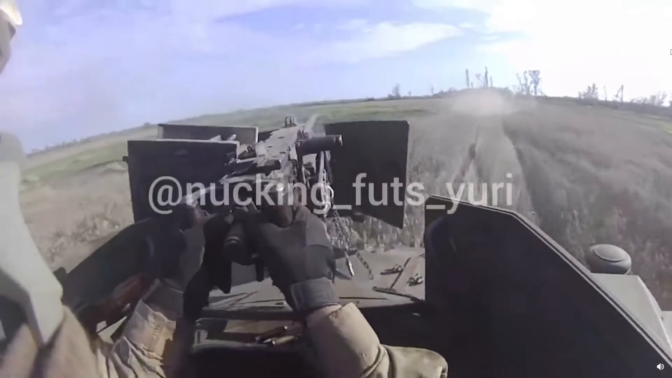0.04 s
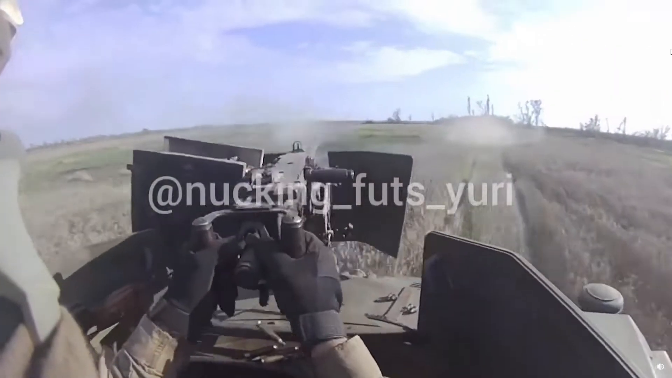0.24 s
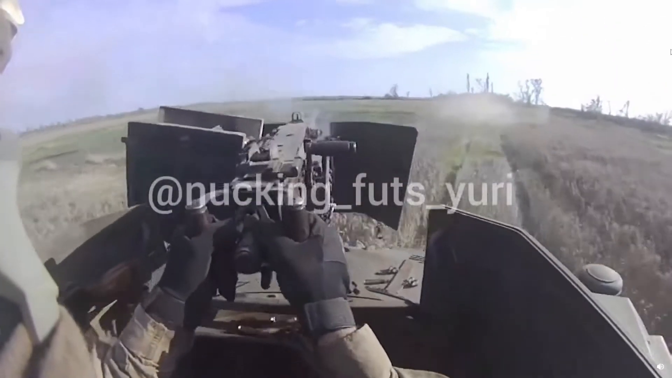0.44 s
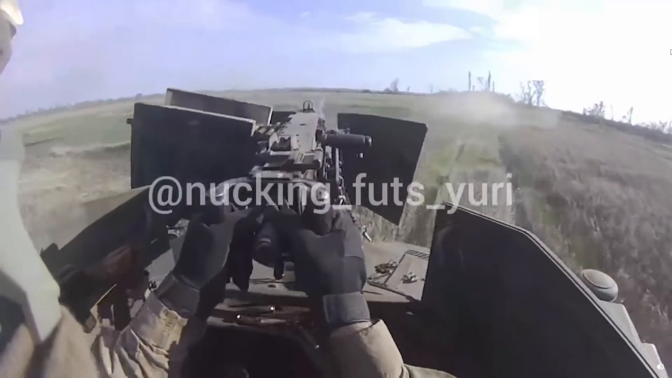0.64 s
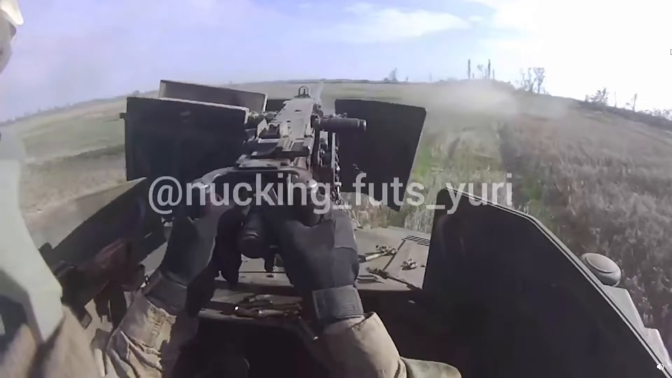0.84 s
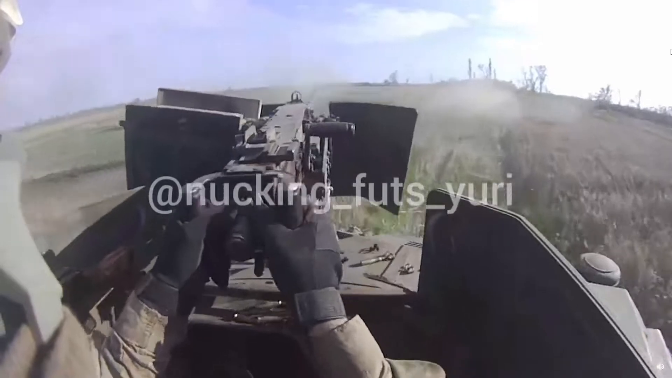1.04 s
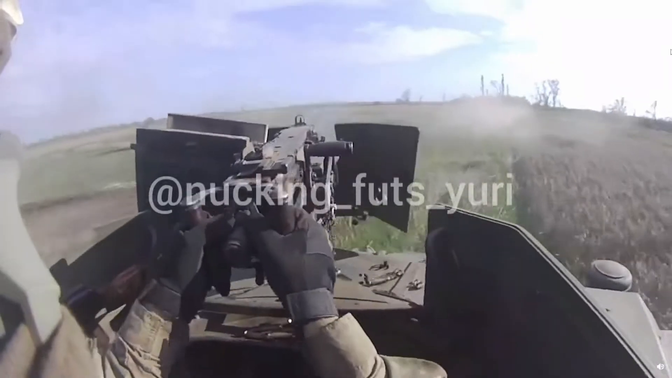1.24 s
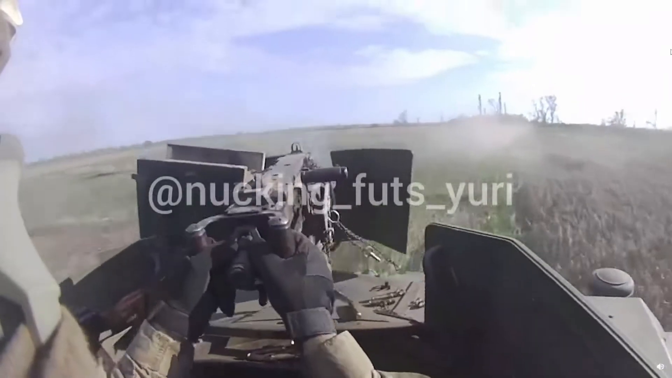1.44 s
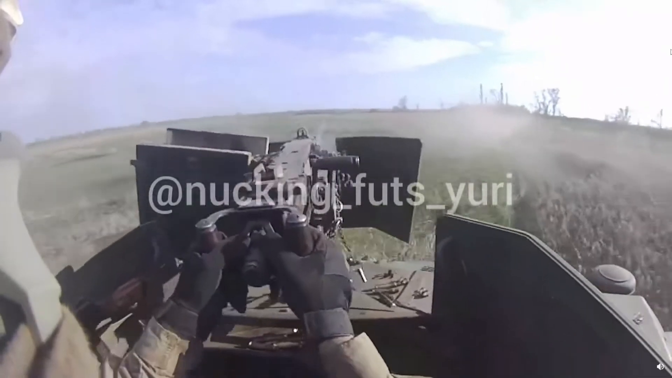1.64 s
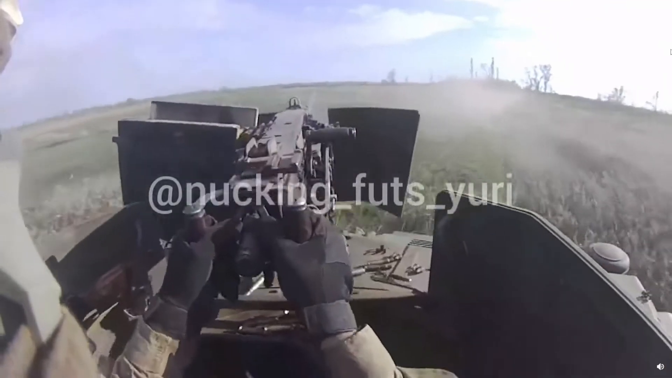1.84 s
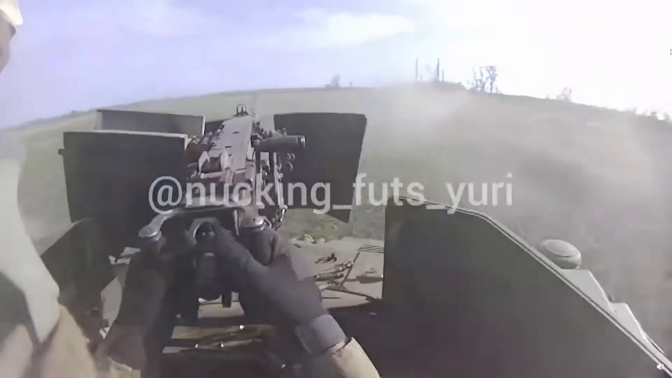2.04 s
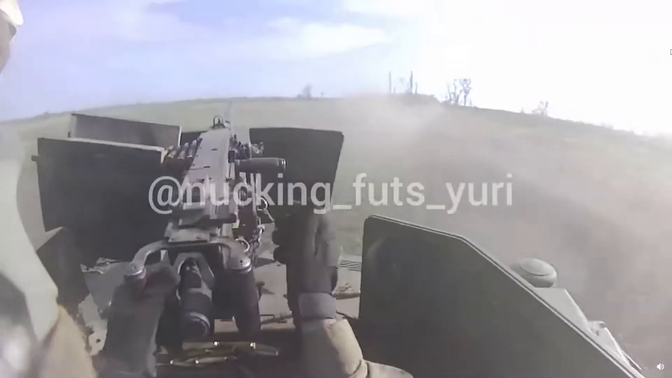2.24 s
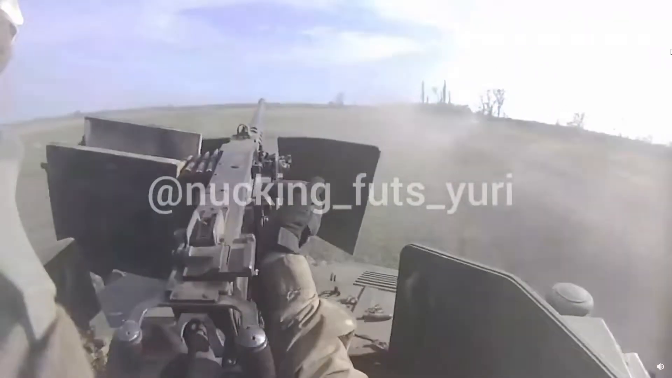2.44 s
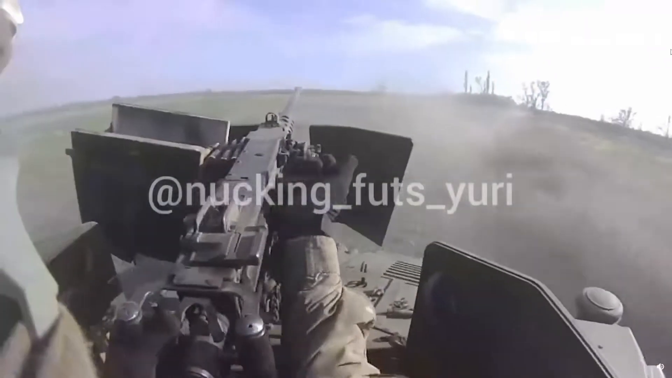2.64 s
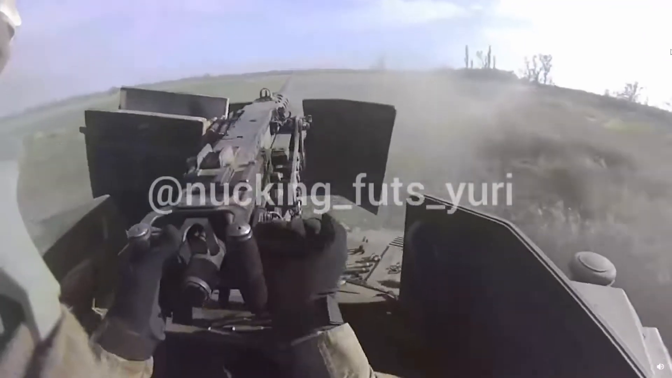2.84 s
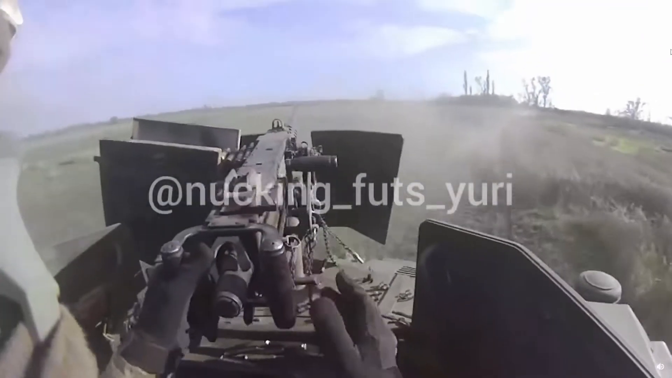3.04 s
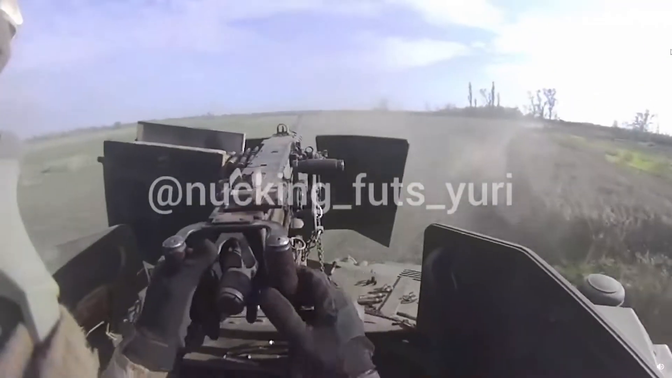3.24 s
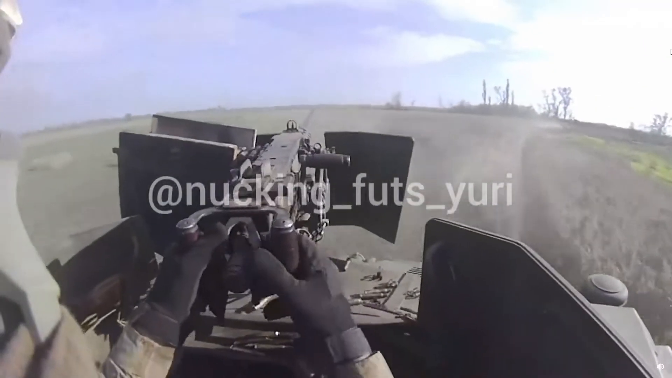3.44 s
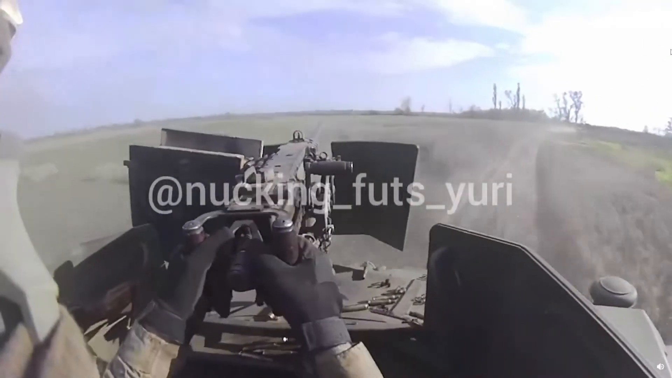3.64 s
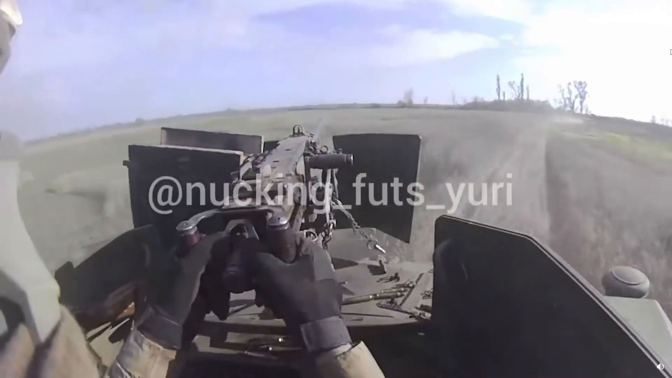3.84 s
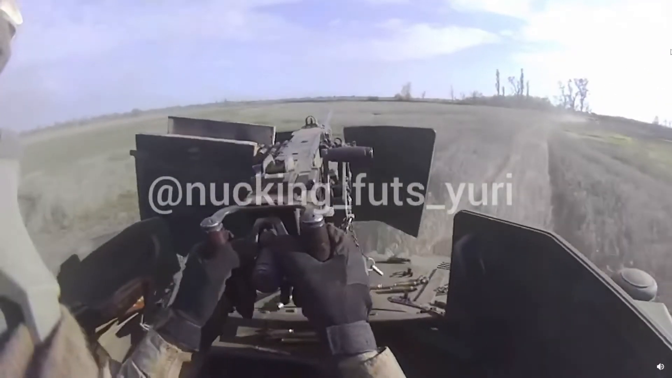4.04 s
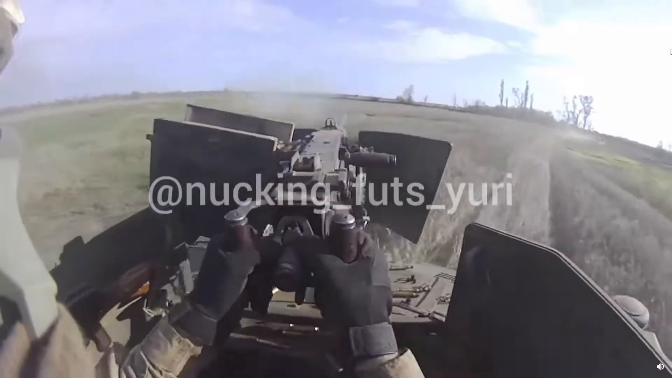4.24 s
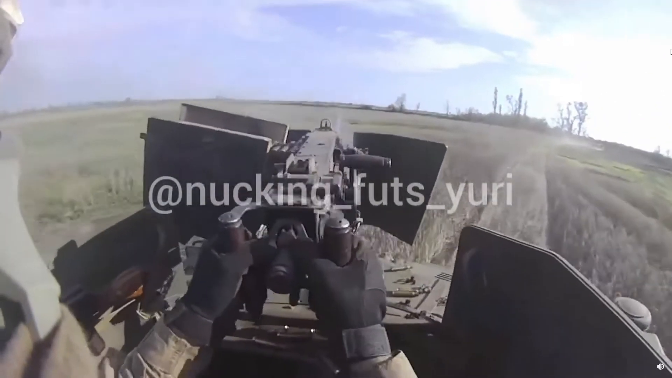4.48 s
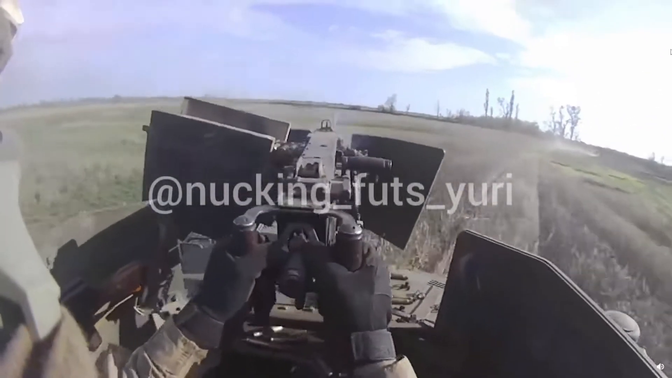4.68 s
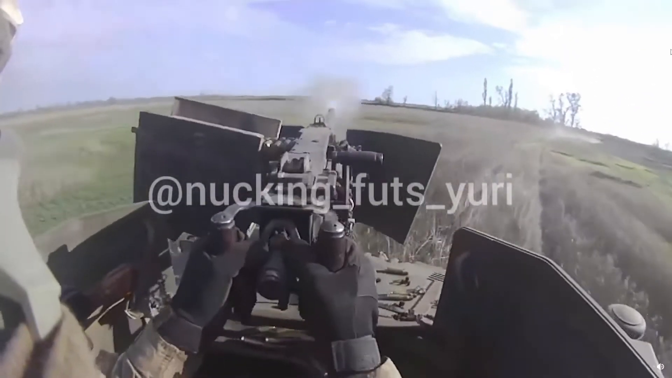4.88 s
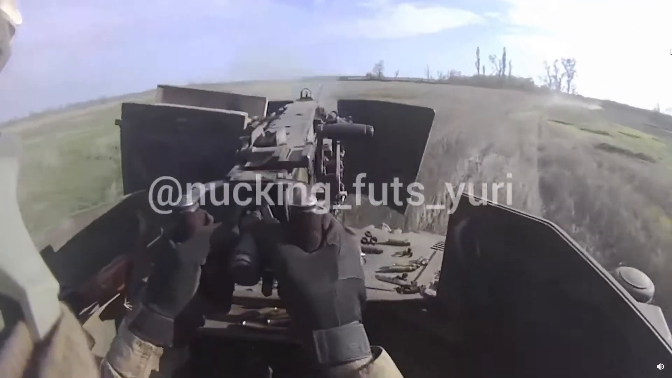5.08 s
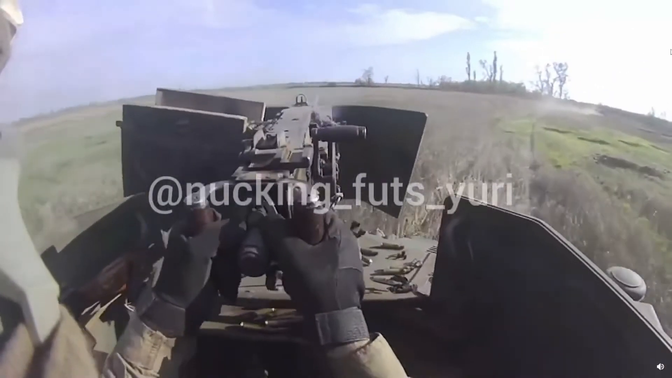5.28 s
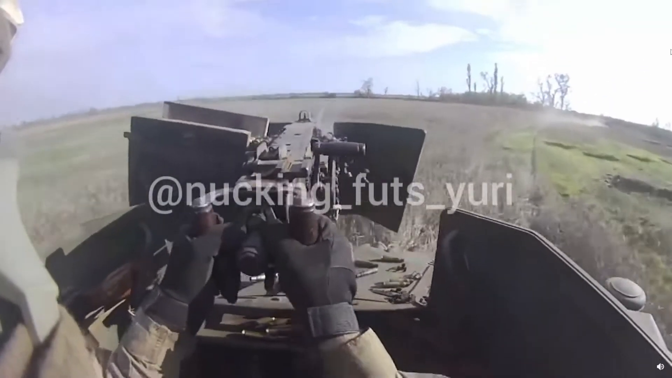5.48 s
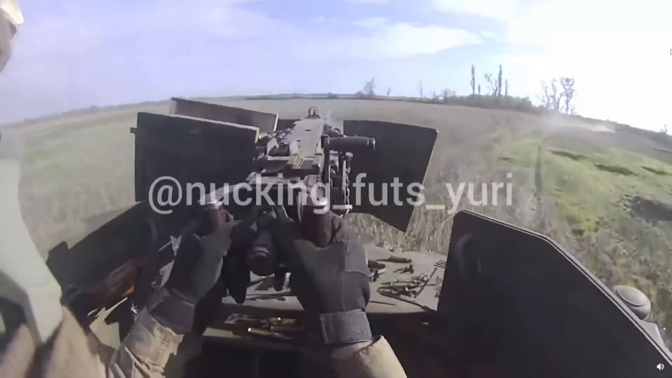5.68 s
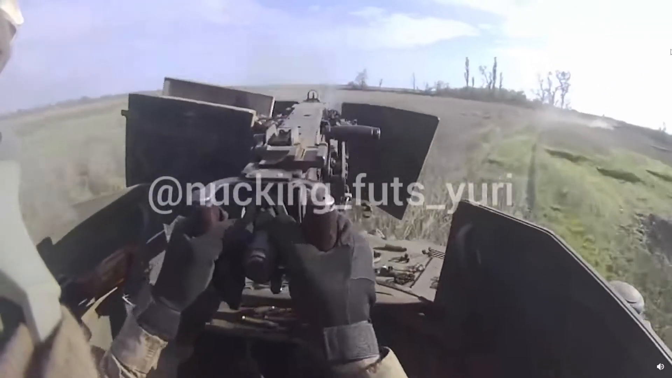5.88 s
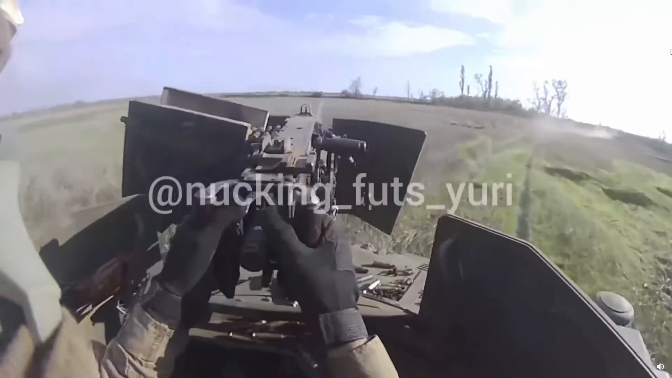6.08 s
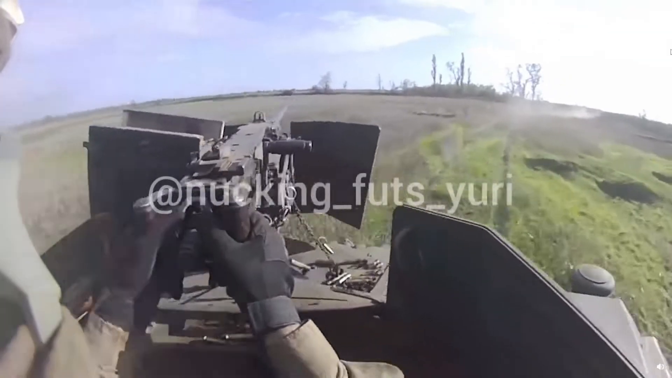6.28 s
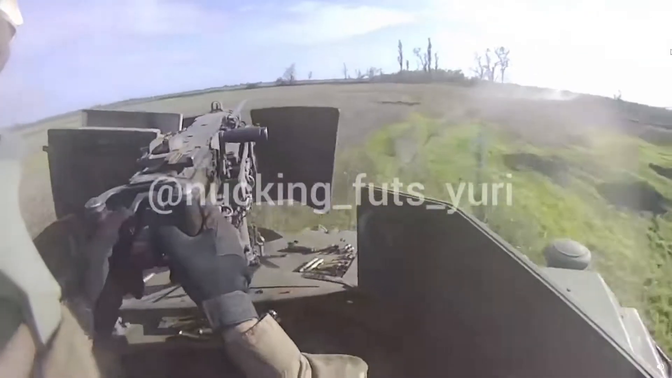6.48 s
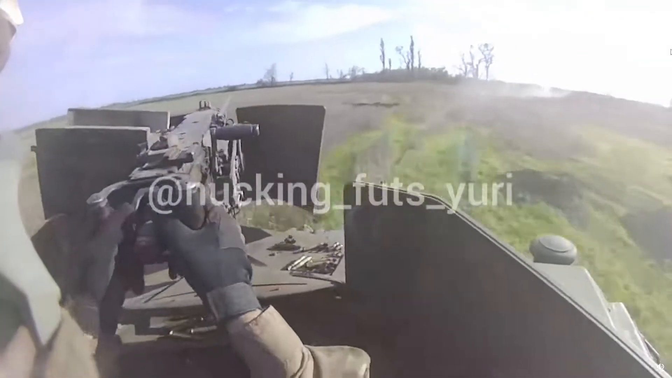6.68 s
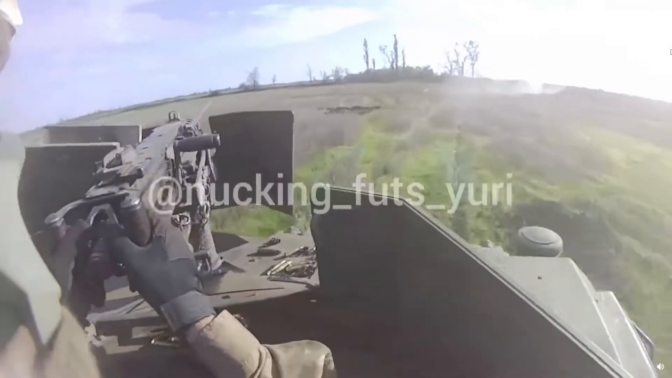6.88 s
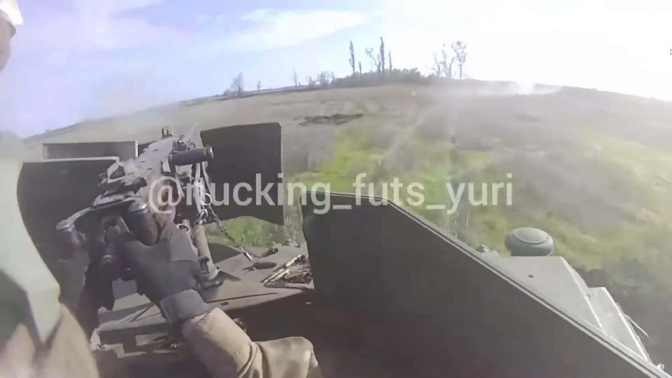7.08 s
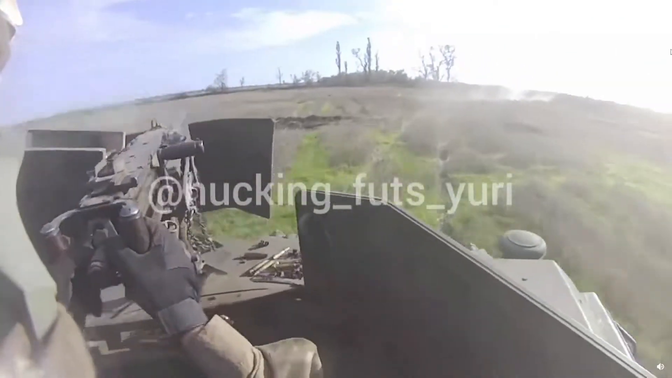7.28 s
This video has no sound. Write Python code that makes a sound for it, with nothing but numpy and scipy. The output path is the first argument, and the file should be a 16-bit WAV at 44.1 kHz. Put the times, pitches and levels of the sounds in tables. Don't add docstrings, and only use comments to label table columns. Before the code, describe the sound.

A vehicle-mounted heavy machine gun fires three bursts of hard, clipped shots, with spent brass clinking on the steel roof over low wind and vehicle rumble.

```python
import sys
import numpy as np
from scipy import signal
from scipy.fft import rfft, irfft
from scipy.io import wavfile
from scipy.ndimage import uniform_filter1d

SR = 44100
rng = np.random.default_rng(int(sys.argv[2]) if len(sys.argv) > 2 else 0)


def voltage_ratio(decibels):
    exponent = np.asarray(decibels, float) / 20
    return 10 ** exponent


def unload_audio(sound):
    columns = np.transpose(np.atleast_2d(sound))
    steps = np.round(np.clip(columns, -1, 1) * 32767)
    wavfile.write(sys.argv[1], SR, steps.astype(np.int16))


N = 322371

# (time [s], housing ring [dB], housing ring [Hz], lower ring [dB], landing of its case [dB])
SHOTS = [(0.019, -18.5, 778, -32, -68), (0.184, -17, 796, -28.5, -60.5), (0.334, -13.5, 770, -35, -47.5),
         (0.497, -13.5, 793, -30, -68), (0.656, -14.5, 777, -29.5, -49), (0.822, -13.5, 776, -28, -61),
         (3.525, -15.5, 768, -34, -64), (3.687, -15.5, 767, -31, -55), (3.875, -15, 758, -30, -51.5),
         (4.027, -14.5, 765, -27.5, -45.5), (4.197, -15.5, 770, -32, -46), (4.358, -15.5, 810, -33, -56),
         (4.513, -15, 838, -29.5, -70), (4.676, -15, 772, -32, -57), (4.853, -15, 789, -35, -51),
         (5.017, -14, 751, -33, -46.5), (5.173, -15.5, 790, -31, -77), (6.365, -16, 793, -35.5, -70),
         (6.527, -14, 820, -36, -56), (6.717, -12.5, 765, -39, -55), (6.864, -13, 778, -38, -52),
         (7.007, -16, 805, -32, -73), (7.169, -12, 878, -26, -74)]
# (frequency [Hz], level [dB], t60 [s])
HOUSING_MODES = [(918, -16.5, 0.06), (1209, -20, 0.031), (1568, -14.5, 0.011), (1944, -30.5, 0.037),
                 (2316, -22, 0.028), (3300, -29, 0.0072), (4645, -14, 0.014)]
# (frequency [Hz], level [dB], t60 [s])
PORT_MODES = [(6560, -9, 0.0026), (6530, -2.5, 0.0062), (7000, -7, 0.0041), (6930, -25.5, 0.0075),
              (8840, -14.5, 0.0069), (11500, -27.5, 0.002), (12000, -20.5, 0.015)]
# (frequency [Hz], level [dB], t60 [s])
CAVITY_MODES = [(160, -7, 0.06), (265, 0, 0.05), (322, 3, 0.045), (443, 5, .04), (580, 2.5, 0.035)]
# (delay [s], level [dB])
ECHOES = [
    (.0013, 4),
    (.0027, -2.5),
    (.0040, -8.5),
    (.0054, -7.5),
    (.0075, -17.5),
    (.0105, -13.5),
]
# (time [s], port ring [dB])
AIM = [
    (0, -19),
    (0.9, -17.5),
    (3.5, -18.5),
    (5.2, -17),
    (6.3, -21.5),
    (6.6, -26),
    (6.9, -18.5),
    (7.3, -20.5),
]
# (frequency [Hz], density [dB per Hz])
SPRAY_SPECTRUM = [(680, -3), (1150, 2.5), (1690, -3), (1880, -20.5), (2320, -11), (3600, -10),
                  (4030, -13.5), (6130, -6), (8300, -13.5), (12700, -25.5), (14000, -32)]
# (frequency [Hz], density [dB per Hz])
STROKE_SPECTRUM = [(59, -37), (100, -19), (264, 5.5), (791, 1.5), (1160, -8.5), (1310, -15), (1590, -5),
                   (4560, -12.5), (6660, 0.5), (12300, -18), (15500, -38.5)]
# (frequency [Hz], density [dB per Hz])
SMEAR_SPECTRUM = [(240, -64.5), (400, -34), (1220, -18.5), (3480, -29), (4990, -6), (5380, -14.5),
                  (6640, 2), (11100, -26), (13100, -14), (14500, -37)]
# (time [s], smear [dB])
SMEARED_SHOTS = [(0.017, -22.5), (0.184, -38), (0.334, -44), (3.526, -21), (3.686, -29), (3.874, -26.5),
                 (4.026, -41), (4.197, -21.5), (4.359, -27), (5.172, -35), (6.866, -29), (7.007, -33),
                 (7.169, -31)]
# (time [s], level [dB])
TOP_NOISE_SHOTS = [
    (0.184, -45),
    (3.525, -58),
    (3.687, -58),
    (4.197, -44),
    (4.358, -40),
    (4.513, -56),
    (4.853, -52.5),
    (6.864, -53),
    (7.169, -58),
]
# (frequency [Hz], level [dB], t60 [s])
CASE_MODES = [(4850, -18, .1), (5760, -10, .2), (6160, -6, .2), (6420, 0, .2), (6550, -4, .2),
              (6665, -3, .25), (7210, -9, .25), (7870, -9, .25), (8890, -8, .25), (9745, -3, .45),
              (10835, -6, .35), (11050, -12, .3), (11600, -6, .3), (12350, -7, .3), (12680, -10, .3)]
# (time [s], peak [dB], modes outside the port band [dB], dry tick re ring [dB])
STRAY_CASES = [(0.975, -58, -18, 7), (1.096, -75, -20, 28), (1.157, -66, -5, 13), (1.275, -65, -12, -3),
               (1.3094, -64, -5.5, 0), (1.3723, -64.5, -12, 17), (1.5604, -64, -25, 12),
               (1.6853, -63.5, -8, -3), (1.724, -66, -23, 5), (1.8884, -65.5, -11.5, -3),
               (2.05, -56, -39, 20), (2.1237, -54.5, -24, 12.5), (2.14, -73, -36, -10),
               (2.2094, -64, -34, -11), (2.5206, -52.5, -35, -13), (2.6194, -74, -4, 1),
               (2.8494, -70, -20.5, 8), (3.217, -57, -35.5, -14), (3.3243, -81, -16.5, 2),
               (5.33, -60, -6, 25), (5.4071, -59, -17, 7), (5.4474, -60, -15, 14), (5.5896, -50.5, -2, -7),
               (5.66, -46, -8.5, 1), (5.7094, -53, 0, -9), (5.749, -58, -11, -5), (5.78, -56, -10, -2),
               (5.8194, -63, 2, -3), (5.8694, -67, -7, -2), (6.1694, -81, -20, 6.5)]
# (time [s], length [s], level [dB])
SCRAPES = [
    (1.674, 0.078, -72),
    (2.314, 0.074, -64),
    (2.348, 0.03, -59),
    (3.32, .016, -75),
    (3.385, .04, -75),
    (5.281, 0.07, -62.5),
    (5.438, 0.036, -62.5),
]
# (time [s], level [dB])
RUMBLE = [(0.0, -60.5), (0.3, -64), (0.71, -64.5), (0.98, -67), (1.2, -62.5), (1.55, -62), (1.78, -59),
          (2.0, -59.5), (2.6, -63), (2.97, -58.5), (3.36, -62.5), (4.4, -65), (5.05, -60.5), (5.4, -64),
          (5.8, -60), (6.05, -62.5), (6.5, -57.5), (7.31, -65)]
# (time [s], length [s], change [dB])
LEVEL_DIPS = [
    (2.215, .03, -6.5),
    (3.338, .024, -9),
    (3.425, 0.038, -11.5),
    (5.98, 0.025, 1.5),
]
# (frequency [Hz], density [dB per Hz])
RUMBLE_SPECTRUM = [(12, -27.5), (20, -12.5), (54, -5), (160, -3.5), (226, -4), (288, -0.5), (359, -3),
                   (398, -0.5), (458, -1.5), (528, -2), (714, -3.5), (2500, -26), (3250, -49), (5500, -120)]
# (frequency [Hz], density [dB per Hz])
HISS_SPECTRUM = [(710, -29), (1200, -5.5), (2540, -18.5), (2980, -10.5), (4200, -20.5), (6370, -21),
                 (7250, -21), (7900, -25), (9990, -31.5), (15500, -40)]


def blasts():
    out, t = np.zeros(N + SR), np.arange(SR // 8) / SR
    chance = rng.standard_normal((len(SHOTS), 40))
    for (s, peak_db, hz, lower_db, _), i, luck in zip(SHOTS, fronts(SHOTS), chance):
        push = 1. * (t == 0)
        lower = ring(push, 529 * (1 + 0.027 * luck[8]), t60=0.054) * np.minimum(0.27 + t / 0.0015, 1)
        body = voltage_ratio(lower_db - peak_db + 10.0) * lower
        cavity = struck(push, CAVITY_MODES, luck[25:], spread_db=3, detune=0.027)
        body += voltage_ratio(-43.5 - peak_db) * cavity
        body += voltage_ratio(2.0) * overloaded_ring(t, hz, peak_db)
        for k, (lag, db) in enumerate(ECHOES):
            push[max(round((lag + .0001 * luck[k]) * SR), 1)] += voltage_ratio(db + 2 * luck[k + 32])
        body += voltage_ratio(-0.5) * struck(push, HOUSING_MODES, luck[9:], spread_db=0.5, detune=0.06)
        push[0] = 2
        port = struck(push, PORT_MODES, luck[17:], spread_db=4.5, detune=0.014)
        port_db = np.interp(s, *np.transpose(AIM)) - 2
        out[i:i + len(t)] += voltage_ratio(peak_db) * band(body, 73, 6300) + voltage_ratio(port_db) * band(port, 3100, 11000)
    return out[:N]


def overloaded_ring(t, hz, peak_db):
    usual_db = -15.5
    hold_s = 0.0036 * voltage_ratio(.2 * (usual_db - peak_db))
    held = np.exp(-(t / max(hold_s, .002)) ** 1.6)
    after = voltage_ratio(-7 - 60 * t / 0.046)
    return np.cos(2 * np.pi * hz * t) * (held + after) * np.minimum(0.42 + t / 0.0036, 1)


def blast_noise():
    at = fronts(SHOTS)
    gains = voltage_ratio(-10 + 2.5 * rng.standard_normal(len(at)))
    spray = voltage_ratio(-13.5) * dying(at, gains, 0.064) + voltage_ratio(-23.5) * dying(at, gains, 0, rise=.014)
    thump = dying(at, gains * voltage_ratio(-20), 0.066) * noise_band(300, 700)
    return spray * coloured(SPRAY_SPECTRUM) + thump


def bolt_stroke():
    return dying(fronts(SHOTS), voltage_ratio(-42.5), 0.19) * voltage_ratio(2.0 * drift(60)) * coloured(STROKE_SPECTRUM)


def channel_smear():
    def apart(t60):
        usual = dying(fronts(SHOTS), voltage_ratio(-55.5), t60)
        return usual + dying(fronts(SMEARED_SHOTS), voltage_ratio(np.array(SMEARED_SHOTS)[:, 1]), t60)
    return (apart(0.04) - apart(.012)) * coloured(SMEAR_SPECTRUM)


def top_noise():
    t60 = .02
    level = dying(fronts(SHOTS), voltage_ratio(-68), t60)
    level += dying(fronts(TOP_NOISE_SHOTS), voltage_ratio(np.array(TOP_NOISE_SHOTS)[:, 1]) / 2, t60)
    return level * rms_one(band(noise_band(13300, 15800), 13300, 15800))


def brass():
    cases = landings()
    out = case_rings(cases) + loose_brass()
    s, peak_db, _, tick_db = np.transpose(cases)
    ticks = dying((s * SR).round().astype(int), voltage_ratio(peak_db + tick_db - 18.0), 0.029)
    return out + ticks * noise_band(1500, 8400)


def case_rings(cases):
    out, t = np.zeros(N + SR), np.arange(SR // 3) / SR
    hz, level_db, t60 = np.array(CASE_MODES).T[:, :, None]
    off_port = np.abs(hz - 6550) > 200
    chance = rng.standard_normal((len(cases), 2, len(CASE_MODES), 1))
    for (s, peak_db, upper_db, tick_db), (uneven, detune) in zip(cases, chance):
        damped_t60 = t60 * 0.92 * voltage_ratio(-.3 * max(tick_db, 0))
        mode_db = peak_db + level_db - 7.5 + off_port * (upper_db - 2.5)
        gains = voltage_ratio(mode_db + (4.5 + 1.0 * off_port) * uneven - 60 * t / damped_t60)
        tumble = 1 + 0.25 * np.cos(2 * np.pi * (22 + 9.0 * uneven) * t)
        tones = np.sin(2 * np.pi * hz * (1 + 0.0018 * detune) * t)
        i = round(s * SR)
        out[i:i + len(t)] += (gains * tumble * tones).sum(axis=0) * np.minimum(t / 0.0033, 1)
    return out[:N]


def loose_brass():
    sizes = voltage_ratio(3.0 * np.minimum(rng.exponential(1, N), 4)) * rng.choice([-1, 1], N)
    taps = rms_one(sizes * (rng.random(N) < 2500 / SR))
    chatter = shaking() * voltage_ratio(3.5 * drift(25)) * taps
    out = voltage_ratio(9) * band(band(chatter, 6050, 6850), 5900, 6500) + voltage_ratio(-7.5) * band(chatter, 4200, 12500)
    dealt = rng.integers(0, len(CASE_MODES), N)
    for k, (hz, db, t60) in enumerate(CASE_MODES):
        out += ring(voltage_ratio(db - 32) * chatter * (dealt == k), hz, .55 * t60)
    return out


def landings():
    late_s = .087 + .003 * rng.standard_normal(len(SHOTS))
    fallen = [(shot[0] + lag, shot[4], -19.5, -0.5) for shot, lag in zip(SHOTS, late_s)]
    return fallen + list(STRAY_CASES)


def shaking():
    at, (s, peak_db, _, _) = fronts(SHOTS), np.transpose(STRAY_CASES)
    shots = voltage_ratio(-61) * (dying(at, 0.99, 1.3) - dying(at, 0.84, .15))
    strays = dying((s * SR).astype(int), voltage_ratio(peak_db - 22.5), 0.46)
    at_rest = voltage_ratio(-85.5)
    return at_rest + shots + strays


def scrapes():
    level = bumps([(s, length, voltage_ratio(db)) for s, length, db in SCRAPES])
    grains = rng.standard_normal(N) * voltage_ratio(1.9 * drift(140))
    rub = band(grains, 2200, 8000) + 2.0 * band(grains, 5940, 6930) + 1.5 * band(grains, 3460, 3550)
    return level * rms_one(rub)


def background():
    at, echo_t60 = fronts(SHOTS), .8
    rumble_db = in_time(RUMBLE)[0] + bumps(LEVEL_DIPS)
    echo_db = -68.5 + 0.68 * np.array(SHOTS)[:, 0]
    hiss = voltage_ratio(-72.5 + .75 * (rumble_db - rumble_db.mean())) + dying(at, voltage_ratio(echo_db), echo_t60)
    rumble, gust = coloured(RUMBLE_SPECTRUM), drift(18)
    bass = signal.lfilter(*signal.butter(1, 350, fs=SR), rumble)
    lumpy = voltage_ratio(2.0 * gust) * (voltage_ratio(3.8 * drift(33)) * bass + voltage_ratio(3.45 * drift(51)) * (rumble - bass))
    wash = dying(at, voltage_ratio(-67.5), echo_t60)
    air = hiss * voltage_ratio(-4.0 + 1.3 * gust) * coloured(HISS_SPECTRUM)
    return (voltage_ratio(rumble_db + 5.5) + wash) * rms_one(lumpy) + air


def patchy_treble(x, share):
    _, _, cells = signal.stft(x, nperseg=1024)
    bins, frames = cells.shape
    hz = np.arange(bins) * SR / 1024
    chance = rng.random((bins // 12 + 1, frames // 4 + 1))
    chance = np.repeat(np.repeat(chance, 12, axis=0), 4, axis=1)[:bins, :frames]
    dropped = chance < share * np.clip((hz[:, None] - 5000) / 5000, 0, 1)
    return signal.istft(cells * np.where(dropped, voltage_ratio(-14), 1), nperseg=1024)[1][:N]


def fronts(rows):
    return ((np.array(rows)[:, 0] + .0008) * SR).round().astype(int)


def struck(push, modes, luck, spread_db, detune):
    return sum(voltage_ratio(db + spread_db * luck[k]) * ring(push, hz * (1 + detune * luck[k + 1]), t60)
               for k, (hz, db, t60) in enumerate(modes))


def ring(clicks, hz, t60):
    r, w = voltage_ratio(-60 / (t60 * SR)), 2 * np.pi * hz / SR
    return signal.lfilter([1, -r * np.cos(w)], [1, -2 * r * np.cos(w), r * r], clicks + 1e-18)


def dying(at, gains, t60, rise=0.):
    marks = np.zeros(N)
    marks[at] = gains

    def fall(m, seconds):
        return signal.lfilter([1], [1, -voltage_ratio(-60 / (seconds * SR))], m + 1e-18)
    return fall(marks[::-1], rise)[::-1] if rise else fall(marks, t60)


def bumps(rows):
    t = np.arange(N) / SR
    return sum(height * np.sin(np.pi * np.clip((t - s) / length, 0, 1)) ** .5 for s, length, height in rows)


def in_time(rows):
    s, *columns = np.transpose(rows)
    return [np.interp(np.arange(N) / SR, s, c) for c in columns]


def drift(rate):
    r = np.exp(-80 * np.pi * rate / SR)
    slow = signal.lfilter([1], [1, -2 * r, r * r], rng.standard_normal(N // 40 + 2002))[2000:]
    return np.interp(np.arange(N) / 40, np.arange(len(slow)), np.clip(rms_one(slow), -2.2, 2.2))


def coloured(spectrum):
    hz, level_db = np.transpose(spectrum)
    grid = np.arange(N // 2 + 1) * SR / N + 1
    gain = voltage_ratio(np.interp(np.log(grid), np.log(hz), level_db))
    return rms_one(irfft(rfft(rng.standard_normal(N)) * gain, N))


def noise_band(low_hz, high_hz):
    return rms_one(band(rng.standard_normal(N), low_hz, high_hz))


def band(x, low_hz, high_hz):
    return signal.sosfilt(signal.butter(2, [low_hz, high_hz], "band", fs=SR, output="sos"), x)


def rms_one(x):
    return x / np.sqrt(np.mean(x ** 2) + 1e-20)


def scene():
    at, stroke = fronts(SHOTS), bolt_stroke()
    clinks = brass() + scrapes()
    parted = uniform_filter1d(1. * (drift(9) > .1), size=300)
    parted_treble = band(band(np.roll(clinks + stroke, 300), 4300, 8400), 4300, 8400)
    unlike = channel_smear() + voltage_ratio(-8) * parted * parted_treble

    loud = .5 * np.tanh((blasts() + blast_noise()) / .5)
    loud = signal.sosfilt(signal.butter(3, 150, "high", fs=SR, output="sos"), loud)
    grip = uniform_filter1d(dying(at + round(.011 * SR), 1, 0.37), size=130)
    loud = voltage_ratio(-7.5 * grip) * loud

    duck = voltage_ratio(-4.0 * np.minimum(dying(at, 0.21, 0, rise=.12), 1))
    quiet = patchy_treble(duck * (clinks + background()) + stroke, share=.15)
    quiet = signal.sosfilt(signal.cheby2(12, 14, 13000, fs=SR, output="sos"), quiet)
    both = loud + quiet + unlike * np.array([[1], [-1]])
    return signal.sosfilt(signal.cheby2(14, 36, 13550, fs=SR, output="sos"), both) + top_noise()


def roll_off(x):
    return signal.sosfilt(signal.butter(12, 16460, fs=SR, output="sos"), x)


def record(dry):
    mix = signal.sosfilt(signal.cheby2(10, 60, 16300, fs=SR, output="sos"), dry)
    return roll_off(mix)


dry = scene()
out = record(dry)
unload_audio(out)
```